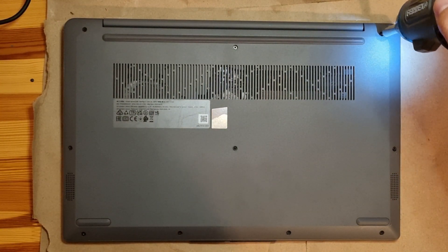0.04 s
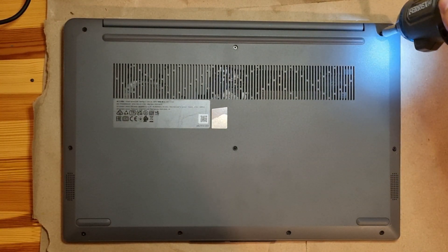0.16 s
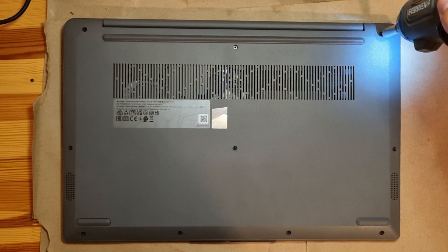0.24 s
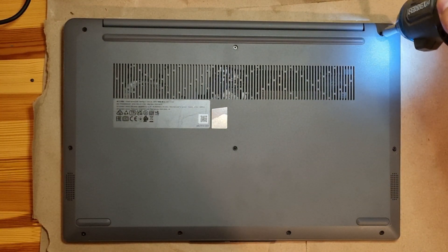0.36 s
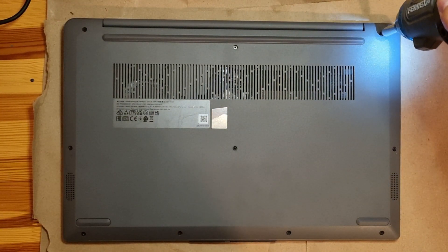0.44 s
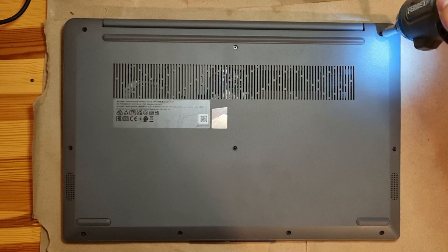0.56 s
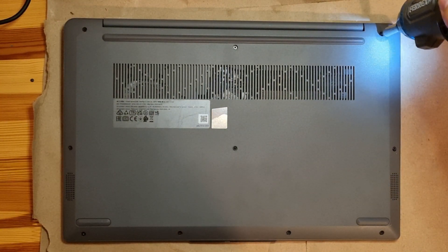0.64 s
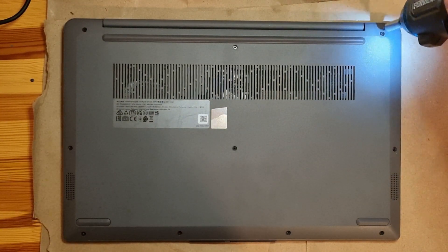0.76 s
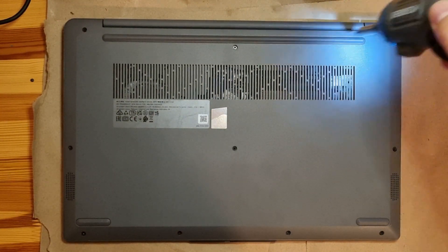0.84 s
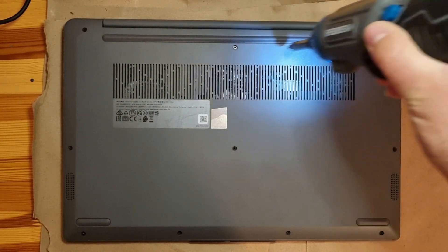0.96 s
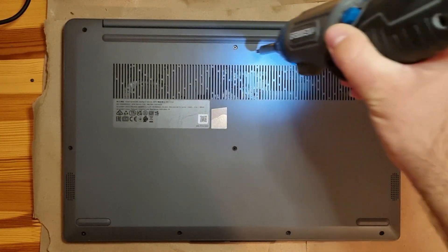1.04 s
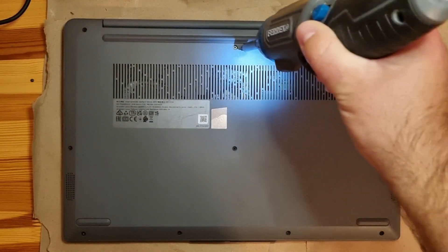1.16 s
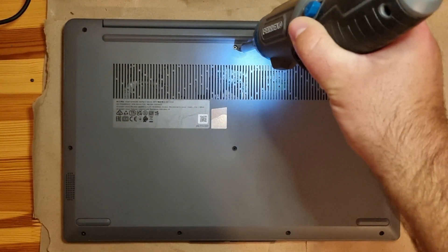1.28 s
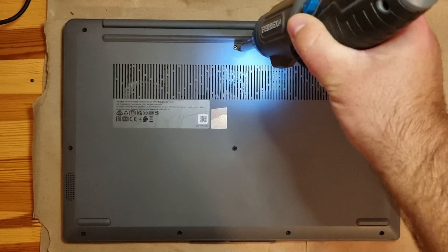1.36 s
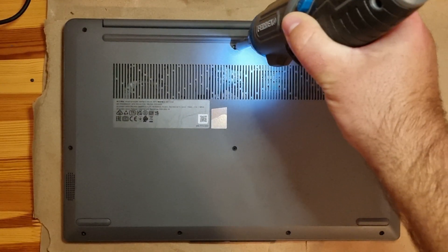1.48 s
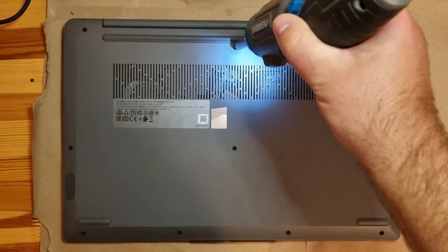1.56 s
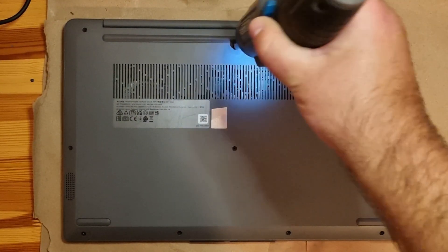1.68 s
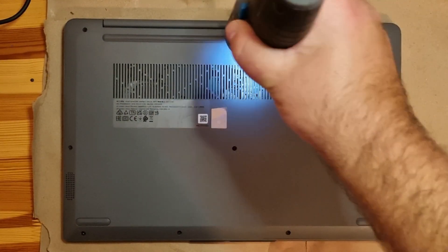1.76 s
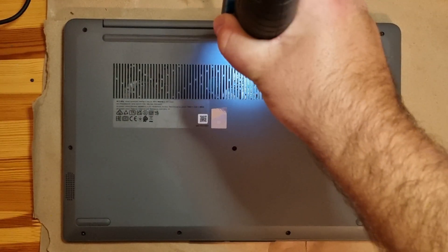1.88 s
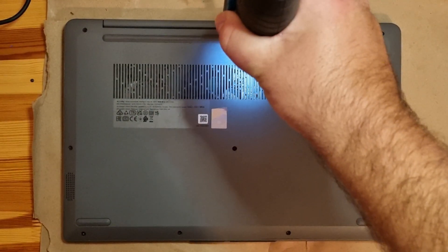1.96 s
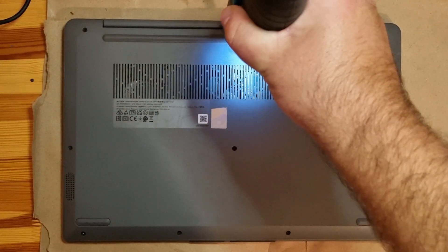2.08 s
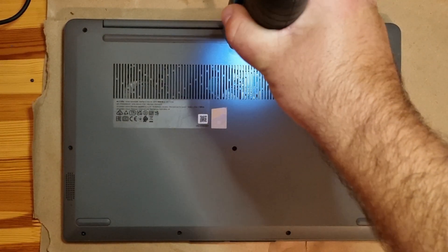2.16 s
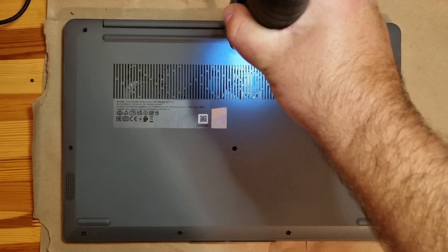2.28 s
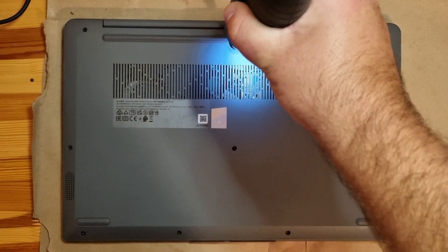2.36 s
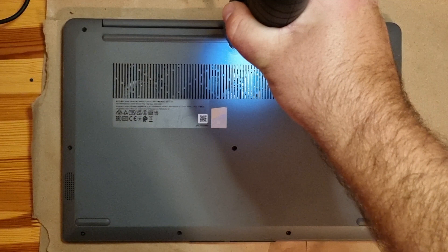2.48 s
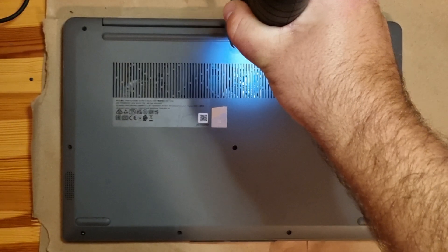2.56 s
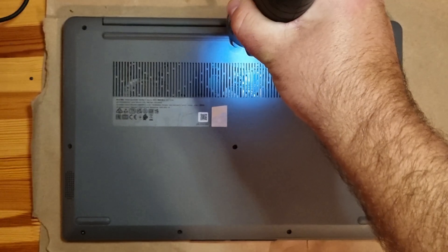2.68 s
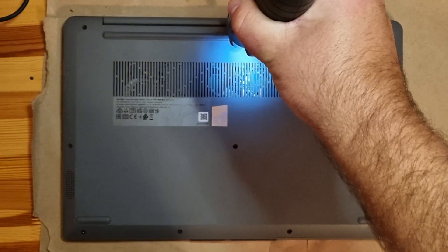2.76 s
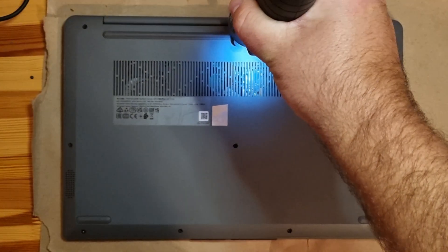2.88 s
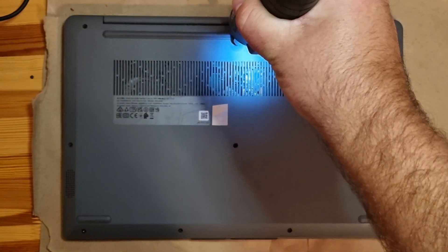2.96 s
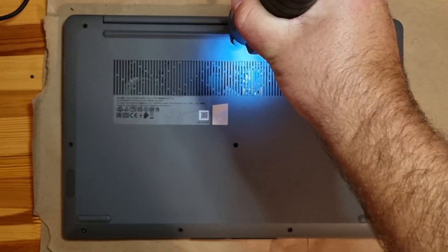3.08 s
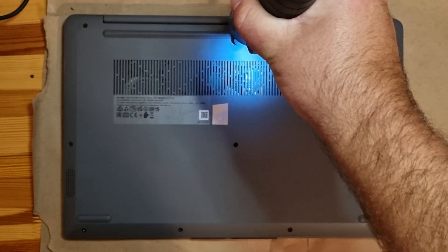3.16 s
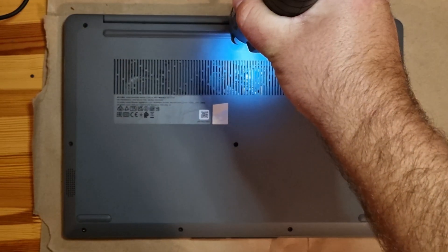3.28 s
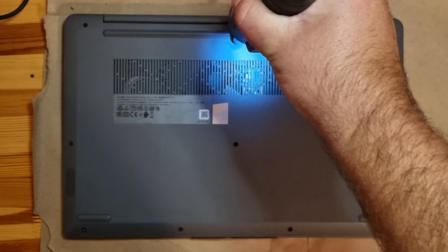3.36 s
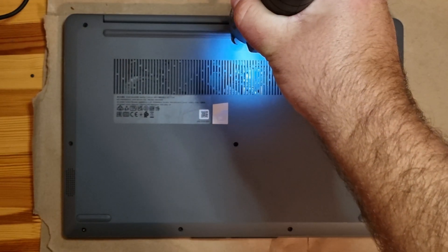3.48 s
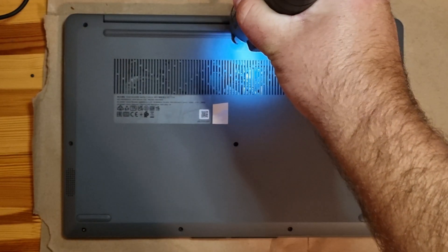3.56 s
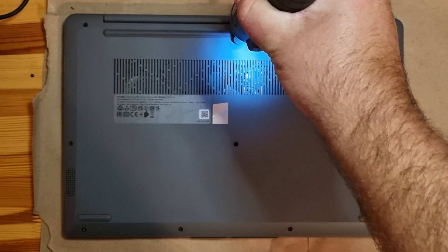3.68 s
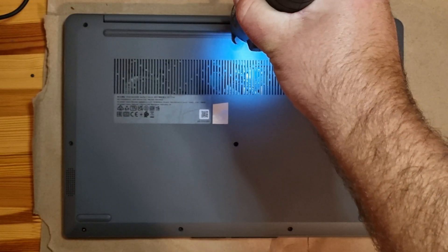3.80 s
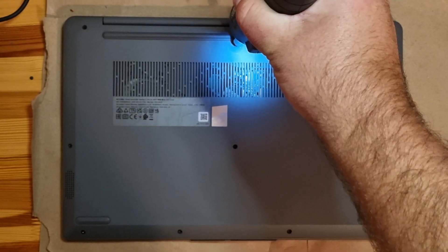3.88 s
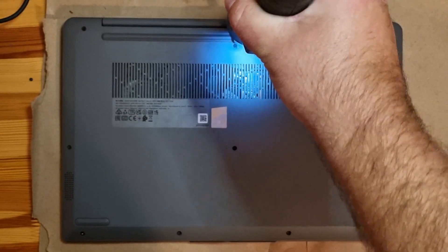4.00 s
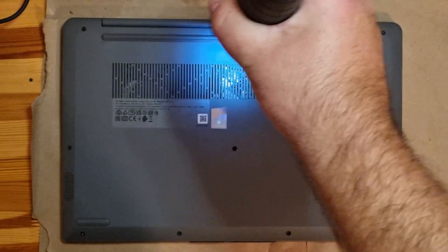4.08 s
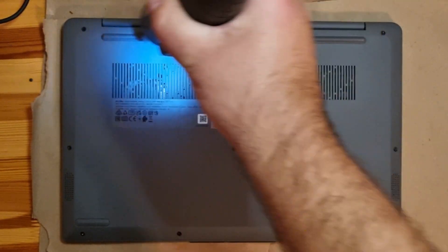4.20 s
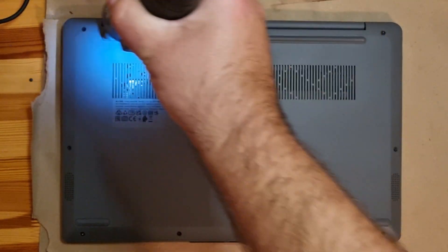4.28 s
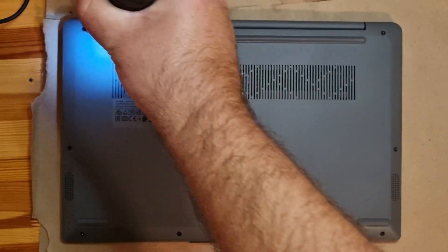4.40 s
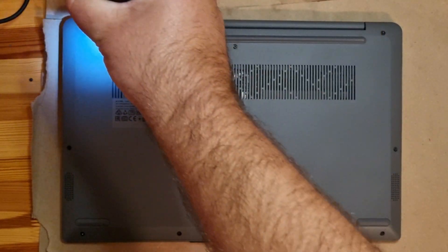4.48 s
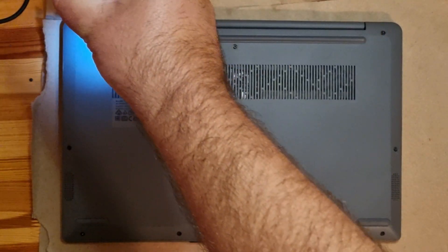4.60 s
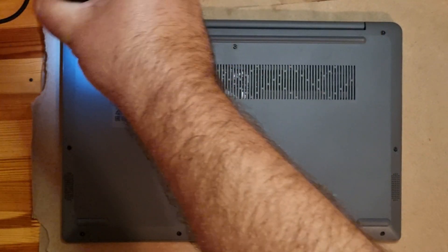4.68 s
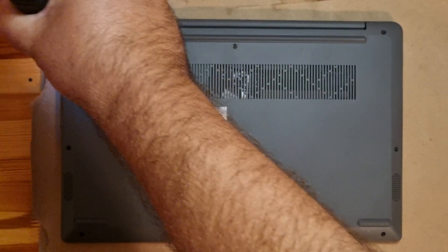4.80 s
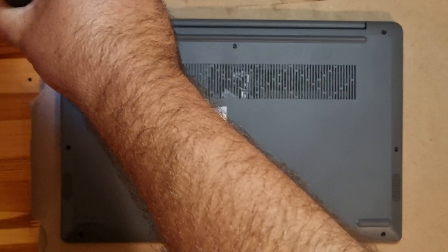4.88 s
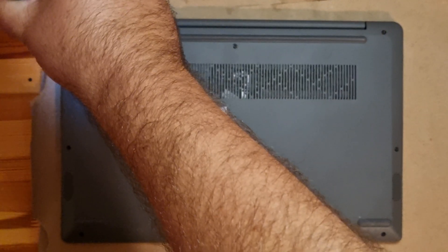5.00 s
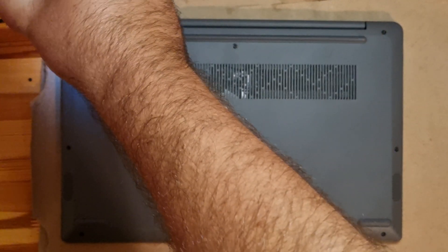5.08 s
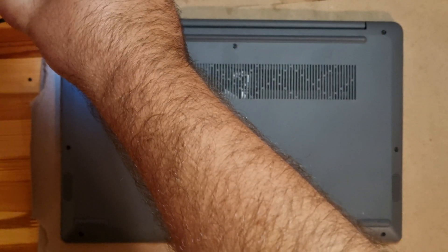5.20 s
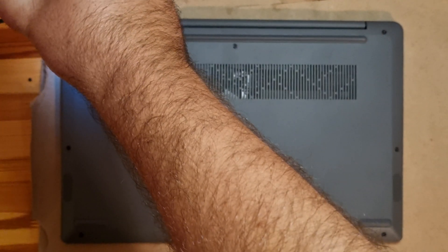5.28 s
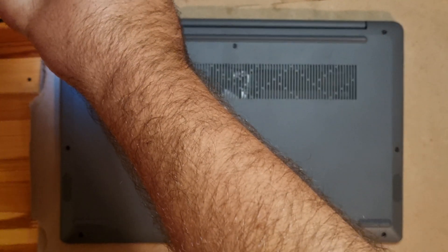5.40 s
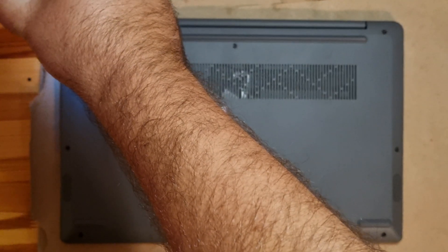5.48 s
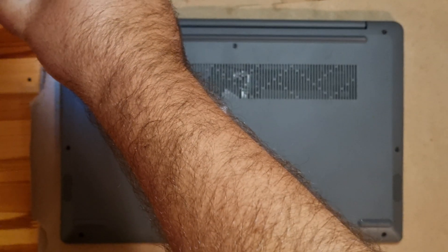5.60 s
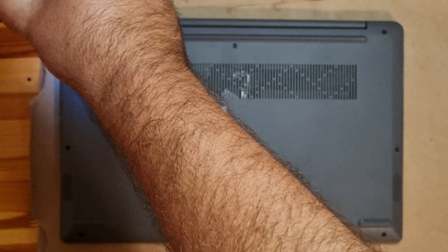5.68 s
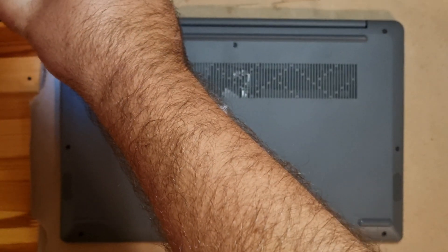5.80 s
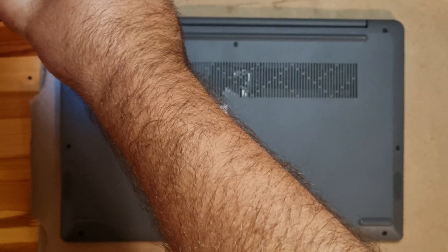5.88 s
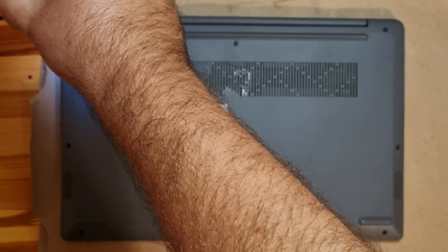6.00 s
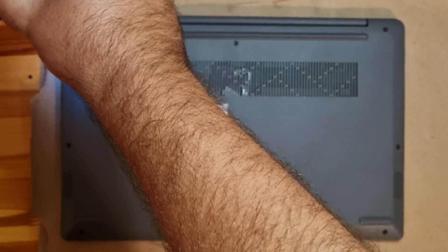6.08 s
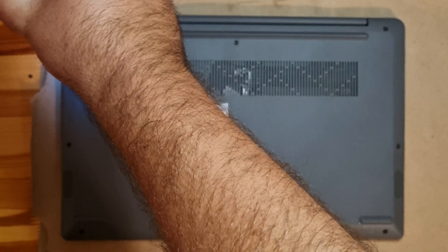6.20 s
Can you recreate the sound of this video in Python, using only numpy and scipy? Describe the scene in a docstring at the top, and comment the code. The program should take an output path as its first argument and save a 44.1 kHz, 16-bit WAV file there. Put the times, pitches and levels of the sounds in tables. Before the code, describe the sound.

A cordless screwdriver is already running close by, a steady whine with a raspy gear rattle, backing a screw out of a laptop cover. The screw snaps sharply with a faint table thump, and the motor coasts down. The bit taps lightly on the cover, then a second, longer run ends with another snap and wind-down. A few small clicks follow before a third run starts and keeps going. The small room adds a short echo.

```python
"""Unscrewing a laptop cover

A cordless screwdriver backs three screws out of a laptop's bottom cover, on a table in a small room.
Its motor whines and its gear teeth rattle through the plastic housing; let go, it coasts slowly to rest.
A loosened screw snaps down over the start of its thread and thumps the table.
Between screws the bit knocks on the cover, and the gears click as the motor starts again."""
import sys
import numpy as np
from scipy import signal
from scipy.fft import rfft, irfft
from scipy.io import wavfile
from scipy.ndimage import uniform_filter1d, map_coordinates

SR = 44100
rng = np.random.default_rng(int(sys.argv[2]) if len(sys.argv) > 2 else 0)


def waveform_to_disk(signal):
    """Save audio, clipped to [-1, 1], as 16-bit WAV at the path in sys.argv[1]."""
    frames = np.transpose(np.atleast_2d(signal))
    scaled = np.clip(frames, -1, 1) * 32767
    samples = np.round(scaled).astype(np.int16)
    wavfile.write(sys.argv[1], SR, samples)


N = 275625
T = np.arange(N) / SR
FREQS = np.maximum(np.fft.rfftfreq(N, 1 / SR), 1)

# still air in the room: f/Hz, level/dB
AIR_SPECTRUM = [(25, -8), (60, -4), (125, -8), (300, -2), (700, -4), (2000, -10), (4000, -15), (8000, -28),
                (15000, -38)]
# how long the room echoes (t60 is the time to fade by 60 dB): f/Hz, t60/s
ROOM_DECAY = [(125, .6), (500, .55), (2000, .5), (6000, .36), (14000, .25)]
# tones of the table with the laptop on it: f/Hz, t60/s, level/dB
TABLE_MODES = [(64, .24, -4), (98, .12, -6), (122, 1.2, -10), (195, .25, -6), (330, .2, -4)]
# pushes that reach the table: t/s, level/dB, cut-off/Hz, damping by the hand/(dB/s)
TABLE_PUSHES = [(.448, -35, 340, 0), (3.663, -36, 110, 25), (4.772, -37, 85, 30)]
# a low scrape of the bit, then a short grunt as the motor starts: middle/s, length/s, level/dB
SCRAPE_AND_GRUNT = [(1.42, .17, -52), (1.71, .16, -58)]
# tones of the cover: f/Hz, t60/s, level/dB
COVER_MODES = [(195, .2, -31), (315, .16, -26.5), (400, .05, -29), (540, .05, -17), (770, .05, -20),
               (1060, .05, -23), (1260, .04, -18), (1600, .035, -14), (1900, .03, -15), (3050, .03, -19)]
# knocks on the cover, and the gears' click as the motor starts:
# t/s, level/dB, struck spot's f/Hz, its t60/s, cut-off/Hz, crack/dB, tick/dB
KNOCKS_AND_CLICKS = [(.448, -10.5, 1400, .008, 3800, -25, -22), (1.173, -29.5, 620, .026, 3500, -9, -15),
                     (1.187, -39, 660, .05, 2500, -10, -7), (1.206, -40, 600, .06, 1500, -8, -10),
                     (1.347, -53, 560, .04, 900, -20, -28), (1.364, -42, 600, .05, 900, -22, -28),
                     (1.413, -34.5, 640, .04, 1500, -19, -28), (1.421, -48, 620, .03, 2000, -10, -2),
                     (1.444, -36, 680, .02, 5000, 1, -14), (1.511, -48, 590, .04, 1200, -18, -20),
                     (1.537, -56, 3800, .015, 6000, -2, -12), (1.637, -40, 3650, .05, 6000, -6, 0),
                     (3.663, -13.5, 680, .012, 4000, -22, -19), (3.664, -15, 1500, .009, 4000, -22, -20),
                     (4.346, -34, 2150, .028, 5000, -12, -15), (4.348, -30, 900, .025, 3000, -14, -17),
                     (4.368, -39, 2100, .025, 4000, -8, -12), (4.371, -30, 800, .038, 3000, -12, -13),
                     (4.378, -43, 420, .08, 1500, -6, -16), (4.432, -30, 1000, .012, 9000, -1, -5),
                     (4.436, -33, 2500, .012, 9000, 0, -2), (4.549, -47, 800, .03, 4000, -6, -7),
                     (4.709, -42, 3650, .008, 9000, -3, 7)]
# one run of the motor per screw: pressed/s, released/s, coasting/s, full shaft speed/Hz, level/dB,
# rise while driven/(dB/s), starting surge/dB, delay on the left/ms
TRIGGER_RUNS = [(-1.0, .645, .75, 267.4, -31.9, .1, 0, .09), (1.633, 3.89, .81, 264.8, -33, .4, 6, -.045),
                (4.705, 7.0, .8, 265.2, -34.9, 0, 4, -.11)]
# how the housing shapes the sound, changing with the grip: f/Hz, level/dB in runs 1, 2, 3
HOUSING_COLOUR = [(100, -27, -28, -30), (400, -21, -22, -22), (700, -16, -15, -19), (1200, -8, -11, -14.5),
                  (1750, -9, -8, -12.5), (2080, -6, -4, -10), (2450, -1.5, -1, -4.5), (3200, -1.5, 0, -3),
                  (4350, -5, -3, -4), (5600, -1, 0, -4), (7800, 0, -1, -2), (8500, -4, -3.5, -6),
                  (10900, -5.5, -6.5, -7), (12500, -.5, -1.5, -3.5), (14000, -2, -2, -4),
                  (15400, 0, -2, -1)]
# where the housing's panels ring: f/Hz
PANEL_PITCHES = [2550, 2950, 3250, 3780]
# where the gearbox rings: f/Hz, width/Hz, level/dB
GEARBOX_RINGS = [(450, 350, 9), (2070, 170, 2), (3650, 400, -1), (6230, 300, -2), (7750, 400, -6)]
# rings that sing while coasting: f/Hz, width/Hz, multiple of shaft speed, level/dB in run 1, later runs
COAST_RINGS = [(730, 100, 3.0, -20, -28), (2080, 200, 11.5, -10, -15), (3680, 400, 24, -5, -15),
               (6250, 260, 41, -7, -11), (7750, 400, 37, -10, -13), (12550, 450, 72, -12, -13),
               (15400, 400, 88, -11, -9)]
# whine of rotor, commutator and meshing gears: multiple of shaft speed, level/dB in runs 1, 2, 3
SHAFT_TONES = [(1, -23.5, -23, -20), (2, -39, -31, -30), (3, -21.5, -30, -29.5), (4, -19, -44, -38),
               (5, -29, -28, -30), (9, -25, -22, -21), (10, -28, -24, -26), (12, -21, -16.5, -16.5),
               (14, -24, -19.5, -26), (15, -21, -22, -20), (18, -20, -22, -24), (21, -18, -15.5, -19),
               (22, -22, -19, -24), (23, -18, -19, -16), (24, -18, -12.5, -18), (27, -17, -20, -17),
               (30, -14, -11, -15.5), (33, -13.5, -22, -26), (35, -15.5, -16.5, -22), (39, -17, -22, -22),
               (47, -17, -23, -17), (48, -17, -17, -18), (57, -18, -15, -18)]
# buzz of a slower planet gear: multiple of its speed, level/dB in runs 1, 2, 3
PLANET_TONES = [(6, -38, -38, -39), (9, -33, -35, -33), (10, -33, -34, -31), (13, -30, -22.5, -29),
                (15, -23, -27, -24), (16, -22, -23, -26), (17, -27, -21.5, -27), (19, -25, -22.5, -26),
                (36, -20, -21, -27)]
# single tones swell as the grip shifts: multiple of shaft speed, middle/s, half length/s, rise/dB
GRIP_SWELLS = [(21, 2.15, .2, 2), (12, 2.9, .15, 3), (23, 5.4, .16, 5), (12, 5.55, .2, 7),
               (30, 5.95, .25, 4)]
# how much louder the tool is on the left than on the right: f/Hz, level/dB
LEFT_BOOST = [(300, .3), (2400, 1.2), (4400, .3), (8000, 1.7), (14000, -2.1)]

PLANET_RATIO = .5944  # planet gear turns per turn of the shaft
TOP_HZ = 15750  # upper edge of the treble


def undb(db):
    """Turn decibels into a gain."""
    return 10 ** (np.asarray(db) / 20)


def unit(x):
    """Scale to an average (rms) level of 1."""
    return x / np.sqrt(np.mean(x ** 2))


def steady(x):
    """Hold the slow level of a stereo sound at 1."""
    return x / np.sqrt(uniform_filter1d(np.mean(x ** 2, axis=0), size=8192))


def colour(points):
    """Gain at every frequency from (f/Hz, level/dB) points."""
    hz, db = np.transpose(points)
    return undb(np.interp(np.log(FREQS), np.log(hz), db))


def walk(rate):
    """A smooth random wobble of size near 1, turning about rate times a second."""
    hold = max(int(SR / rate), 1)
    return 1.2 * uniform_filter1d(rng.standard_normal(N)[np.arange(N) // hold], hold)


def band(x, lo_hz, hi_hz):
    """Gently fade what lies outside two frequencies."""
    return signal.sosfilt(signal.butter(2, [lo_hz, min(hi_hz, .45 * SR)], "band", fs=SR, output="sos"), x)


def noise(length=N):
    """White noise, separate for left and right."""
    return rng.standard_normal((2, length))


def noise_band(hz, width_hz):
    """Stereo noise around one pitch, at level 1."""
    return unit(band(noise(), hz - width_hz / 2, hz + width_hz / 2))


def ring(modes, t):
    """Fading tones (f/Hz, t60/s, level/dB), t seconds after a hit."""
    return sum(undb(db - 60 * t / t60) * np.sin(2 * np.pi * hz * t) for hz, t60, db in modes)


def spread(spectra, apart_hz, width=1):
    """Mix two spectra to left and right: alike in the bass, apart in the treble."""
    side = width * spectra[1] * FREQS / np.hypot(FREQS, apart_hz)
    return np.array([spectra[0] + side, spectra[0] - side])


def run_at():
    """Which run of the motor each moment belongs to."""
    return np.searchsorted([run[0] for run in TRIGGER_RUNS[1:]], T)


def room_air(level_db=-64):
    """The still air makes a faint, even hush."""
    return undb(level_db) * unit(irfft(spread(rfft(noise()), apart_hz=40) * colour(AIR_SPECTRUM), N))


def room_echo(x, wet_db, gap_s=.004):
    """Echoes from the walls blur together; the treble dies first."""
    hz, t60s = np.transpose(ROOM_DECAY)
    wash = spread(rfft(noise()), apart_hz=700)
    shares = [np.interp(np.log(FREQS), np.log(hz), row) for row in np.eye(len(hz))]
    tail = sum(irfft(wash * share, N)[:, :SR] * undb(-60 * T[:SR] / t60)
               for share, t60 in zip(shares, t60s))
    tail *= np.clip(T[:SR] / gap_s - 1, 0, 1)
    return undb(wet_db) * signal.fftconvolve(x, unit(tail) / np.sqrt(SR), axes=1)[:, :N]


def table_thumps(shudder_db=6, shudder_t60=.22, shudder_hz=170):
    """A push makes the table boom and shudder briefly, unevenly to left and right."""
    out = np.zeros((2, N))
    for at_s, db, top_hz, damping in TABLE_PUSHES:
        start = int(at_s * SR)
        t = T[:min(SR, N - start)]
        shudder = band(noise(len(t)) * undb(shudder_db - 60 * t / shudder_t60), 42, shudder_hz)
        boom = band(ring(TABLE_MODES, t), 45, top_hz) * undb(-damping * t)
        out[:, start:start + len(t)] += undb(db) * (boom + shudder)
    return out


def scrape_and_grunt(lo_hz=520, hi_hz=720, rough_db=4):
    """Low, rough noise swells and fades: the bit's scrape, then the starting motor's grunt."""
    rough = rng.standard_normal(N) * undb(rough_db * walk(90))
    swells = sum(undb(db) * np.cos(np.pi * np.clip((T - middle) / length, -.5, .5))
                 for middle, length, db in SCRAPE_AND_GRUNT)
    return unit(band(rough, lo_hz, hi_hz)) * swells


def knocks_and_clicks(tick_t60=.035, crack_t60=.05, crack_hz=(1400, 3700), cover_db=-2):
    """Each cover knock or gear click is a short ring, a crack of plastic and a tick of metal."""
    out = np.zeros((2, N))
    for at_s, db, hz, t60, top_hz, crack_db, tick_db in KNOCKS_AND_CLICKS:
        start = int(at_s * SR)
        t = T[:min(SR, N - start)]
        tick = signal.lfilter([.6], [1, -.4], noise(len(t))) * undb(tick_db - 60 * t / tick_t60)
        crack = band(noise(len(t)), *crack_hz) * undb(crack_db - 60 * t / crack_t60)
        body = ring([(hz, t60, 0)], t) + undb(cover_db) * ring(COVER_MODES, t)
        # thin parts give off little bass, and a soft hit little treble
        body = band(body, .55 * hz, top_hz)
        out[:, start:start + len(t)] += undb(db) * (body + crack + tick)
    return out


def panel_chatter(level_db=-21.5, flare_db=4, width_hz=130):
    """The housing's panels flare up one by one as the hand and the load shift."""
    flares = sum(undb(flare_db * (walk(16) - .5)) * noise_band(hz, width_hz) for hz in PANEL_PITCHES)
    return undb(level_db) * flares


def gear_grind(since_press, peak_s=.06, lo_hz=2300, hi_hz=3800):
    """The teeth grind for a moment as the screw breaks loose."""
    swell = (since_press / peak_s * np.exp(1 - since_press / peak_s)) ** 4
    return swell * unit(band(noise(), lo_hz, hi_hz))


def coast_singing(shaft_hz, catch_share=.23):
    """Each ring swells as the beat of the slowing teeth sinks through its pitch."""
    out, later_run = np.zeros((2, N)), run_at() > 0
    for hz, width, multiple, first_db, later_db in COAST_RINGS:
        caught = np.exp(-((multiple * shaft_hz / hz - 1) / catch_share) ** 2)
        out += caught * undb(np.where(later_run, later_db, first_db)) * noise_band(hz, width)
    return out


def worn_wheel(turns, bumps):
    """A wheel's uneven teeth make the same clatter on every turn."""
    place = [turns % 1 * bumps]
    return np.array([unit(map_coordinates(side, place, mode="grid-wrap")) for side in noise(bumps)])


def gear_rattle(turns, speed, repeat_db=-8, scatter_db=1.1, ring_db=-20, coast_ring_db=14,
                split_hz=9000, hollow_hz=1450, hollow_width_hz=550, dull_hz=5500):
    """Teeth knock through the housing and ring the gearbox, giving a rasp and a high hiss."""
    teeth = noise() + undb(repeat_db) * speed ** 2 * worn_wheel(PLANET_RATIO * turns, bumps=280)
    teeth *= undb(scatter_db * walk(1600)) * (1 + .025 * np.cos(2 * np.pi * turns))
    teeth = spread(rfft(teeth), apart_hz=1700, width=.85)
    grips = [colour(np.array(HOUSING_COLOUR)[:, [0, k + 1]]) for k in range(len(TRIGGER_RUNS))]
    shell = rfft(sum((run_at() == k) * irfft(teeth * grip, N) for k, grip in enumerate(grips)))
    rings = sum(undb(db) / (1 + 1j * (FREQS ** 2 - hz ** 2) / (FREQS * width))
                for hz, width, db in GEARBOX_RINGS)
    # at middling speed the gears knock freely, so the rings stand out
    ring_gain = undb(ring_db) + undb(coast_ring_db) * speed ** 2 * (1 - speed)
    treble = 1 / (1 + (split_hz / FREQS) ** 16)
    hiss = irfft(shell * treble * (FREQS < TOP_HZ), N)
    rasp = irfft(shell * (1 - treble), N) + ring_gain * irfft(shell * rings, N)
    # below full speed, the housing's middle range falls away
    middle = irfft(shell * np.exp(-((FREQS - hollow_hz) / hollow_width_hz) ** 2), N)
    rasp -= .7 * (1 - speed ** 6) * middle
    # slow teeth meet softly and sound duller
    dull = irfft(rfft(rasp) / (1 + (FREQS / dull_hz) ** 4), N)
    return steady(dull + speed * (rasp - dull)), steady(hiss)


def motor_whine(turns, speed, waver=5, throb_db=.7, slack=.016, hum_fade=20, apart=.8):
    """Tones follow the shaft and planet gear; slack blurs the high ones and leaves the hum clean."""
    out, run = np.zeros((2, N)), run_at()
    play = slack * walk(30)
    tones = [(k, levels) for k, *levels in SHAFT_TONES]
    tones += [(k * PLANET_RATIO, levels) for k, *levels in PLANET_TONES]
    for multiple, levels in tones:
        highness = multiple / (multiple + 5)
        angle = 2 * np.pi * (multiple * turns + np.sqrt(multiple) * play)
        swell_db = sum(rise * np.exp(-((T - middle) / half) ** 2)
                       for k, middle, half, rise in GRIP_SWELLS if k == multiple)
        level_db = np.array(levels)[run] + swell_db + throb_db * walk(14) - 1.6 * highness
        # the rotor's hum needs full speed; the gear tones glide on as it slows
        strength = speed ** (hum_fade / np.sqrt(multiple)) * undb(level_db)
        for channel, side in zip(out, (1, -1)):
            # short waves reach left and right by different paths
            path = side * highness ** 2 * apart + .8 * highness * walk(25)
            flicker = undb(waver * highness * (.9 * walk(35) - .4))
            channel += strength * flicker * np.sin(angle + path)
    return out


def gear_effort(on, off, spin, coast, run_db, rise_db, surge_db, surge_s=.075,
                unload_db=-2.5, unload_s=.05, settle_db=-2.2, settle_s=.4, stall_speed=.31):
    """Speed and load on the teeth set the tool's gain, plus extra gains for rasp and hiss."""
    driven, released = np.clip(T - on, 0, off - on), np.maximum(T - off, 0)
    load_db = run_db + rise_db * driven + unload_db * (1 - np.exp(-released / unload_s))
    # the level follows speed gently under drive, steeply when coasting; near rest the gears bind
    gain = undb(load_db) * spin ** .6 * coast ** 1.3 * np.tanh(coast / stall_speed)
    # the starting twist presses the teeth together; the hiss builds as they settle
    surge = undb(surge_db * np.exp(-driven / surge_s))
    hiss_gain = coast ** .95 * undb(settle_db * np.exp(-driven / settle_s))
    return gain, surge, hiss_gain


def screwdriver(rasp_db=-1.5, hiss_db=-1.5, whine_db=3.5, grind_db=-10,
                spin_up_s=.04, wander=.0014, flutter_db=.3, sway_db=.25):
    """The motor spins up quickly, holds its speed and, let go, coasts to rest against friction."""
    on, off, coast_s, full_hz, run_db, rise_db, surge_db, lag_ms = np.array(TRIGGER_RUNS)[run_at()].T
    spin = 1 - np.exp(-(T - on) / spin_up_s)
    coast = np.clip(1 - (T - off) / coast_s, 0, 1)
    speed = spin * coast  # 0 at rest, 1 at full speed
    turns = np.cumsum(full_hz * speed * (1 + wander * walk(9))) / SR
    gain, surge, hiss_gain = gear_effort(on, off, spin, coast, run_db, rise_db, surge_db)
    rasp, hiss = gear_rattle(turns, speed)
    gears = undb(rasp_db) * surge * rasp + undb(hiss_db) * hiss_gain * hiss
    gears += undb(grind_db + surge_db) * gear_grind(T - on) + speed ** 2 * panel_chatter()
    tones = undb(whine_db) * motor_whine(turns, speed) + (T > off) * coast_singing(full_hz * speed)
    left, right = (gears + tones) * gain * undb(flutter_db * walk(30) + sway_db * walk(8))
    lag = np.round(lag_ms * SR / 1000).astype(int)
    left = left.take(np.arange(N) - lag, mode="clip")
    balance = colour(LEFT_BOOST) ** np.array([[.5], [-.5]])
    return irfft(rfft(np.array([left, right])) * balance, N)


def scene():
    """Tool and laptop close by, the room behind them."""
    tool = screwdriver()
    knocks = knocks_and_clicks() + scrape_and_grunt()
    direct = tool + knocks + room_air() + table_thumps()
    # the rotor's low hum arrives mostly direct; the rattle fills the room
    rattle = band(tool, 600, 18000)
    return direct + room_echo(rattle, wet_db=-9) + room_echo(knocks, wet_db=-6)


def record(dry):
    """A steep filter cuts off the highest treble."""
    return signal.sosfilt(signal.ellip(12, .2, 80, TOP_HZ, fs=SR, output="sos"), dry)


dry = scene()
out = record(dry)
waveform_to_disk(out)
```